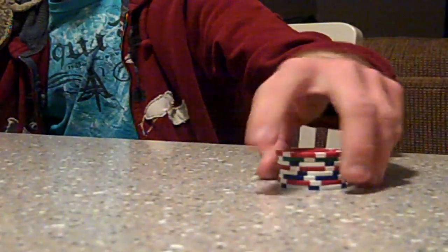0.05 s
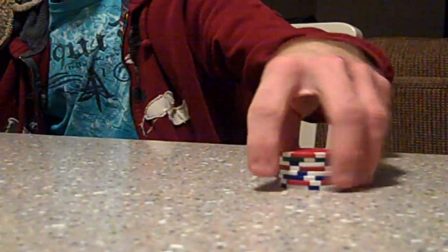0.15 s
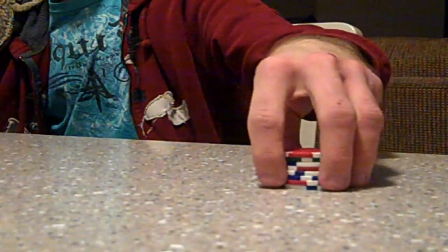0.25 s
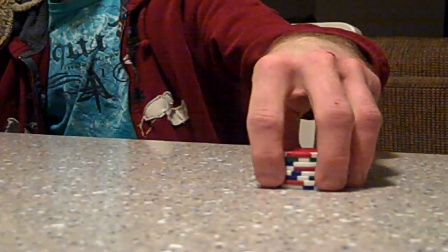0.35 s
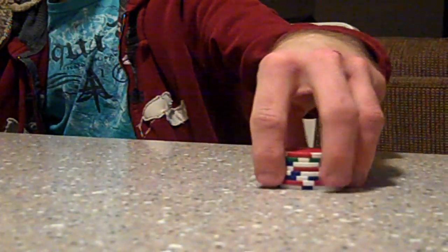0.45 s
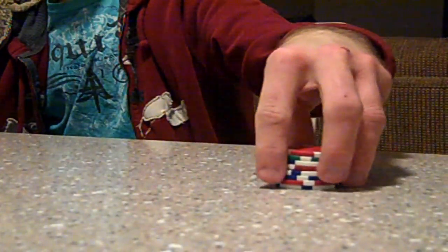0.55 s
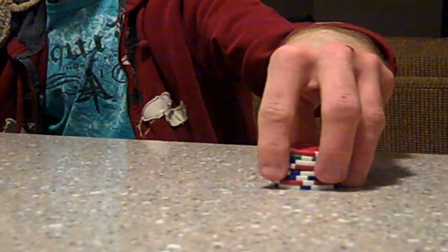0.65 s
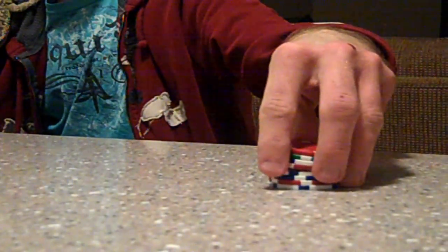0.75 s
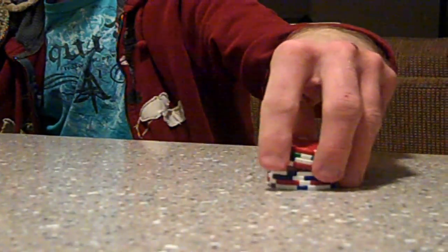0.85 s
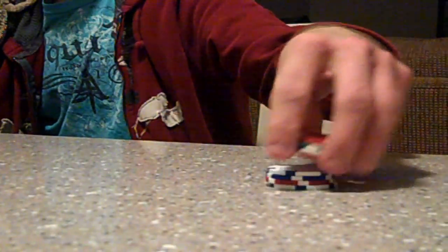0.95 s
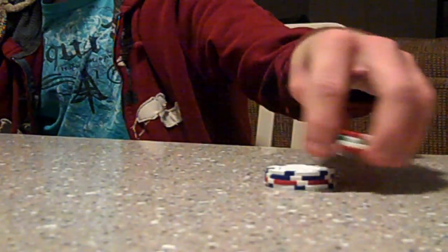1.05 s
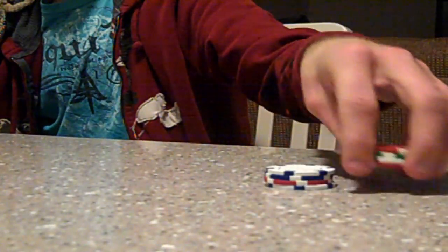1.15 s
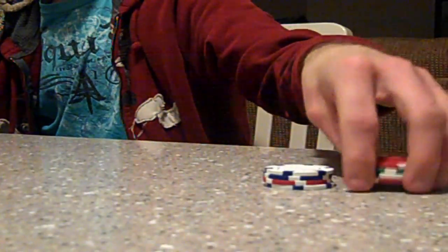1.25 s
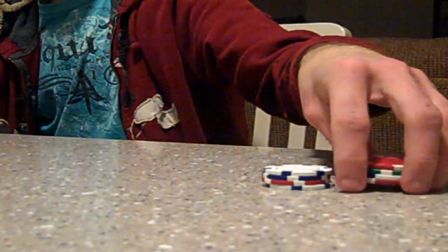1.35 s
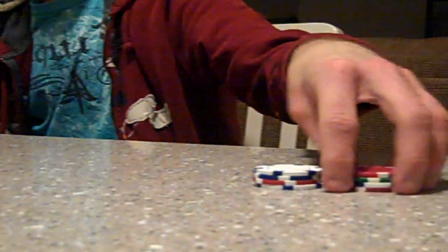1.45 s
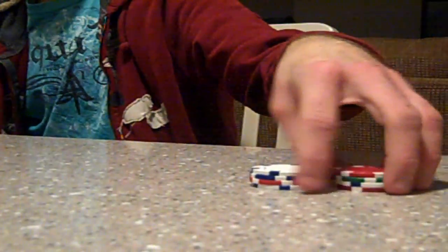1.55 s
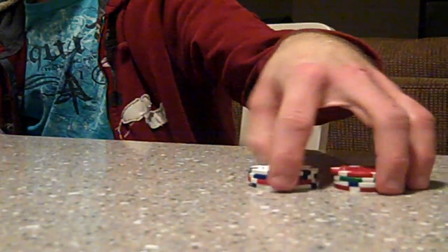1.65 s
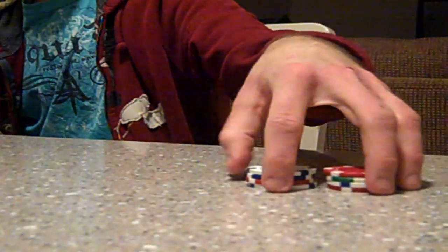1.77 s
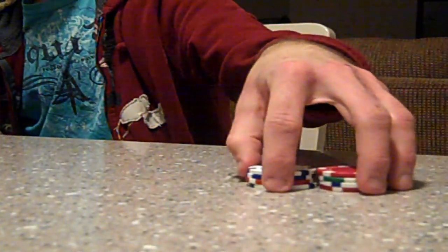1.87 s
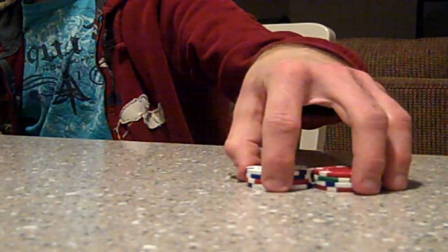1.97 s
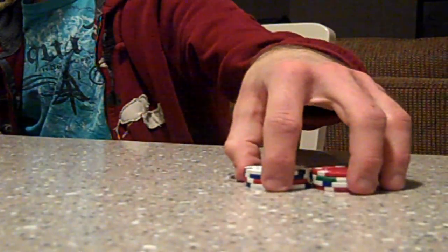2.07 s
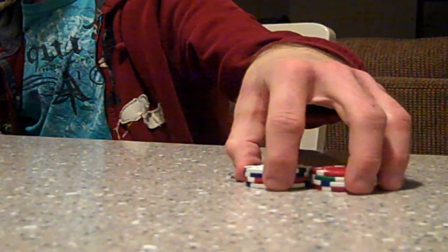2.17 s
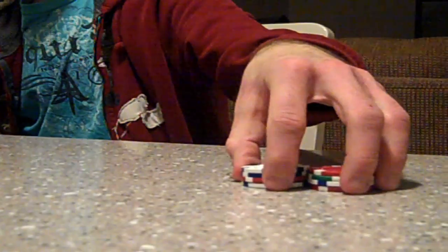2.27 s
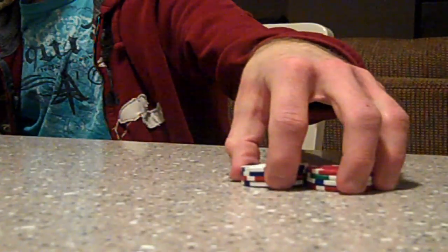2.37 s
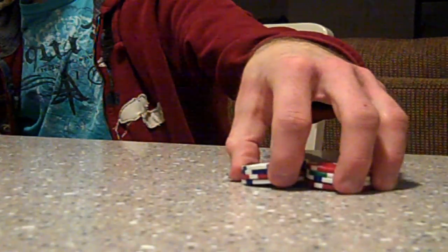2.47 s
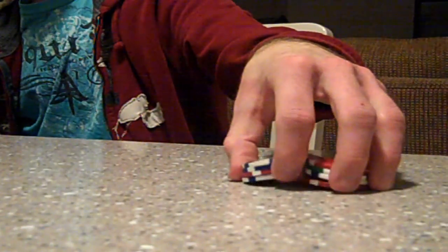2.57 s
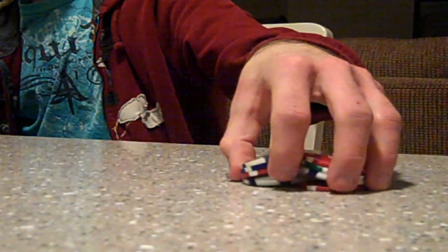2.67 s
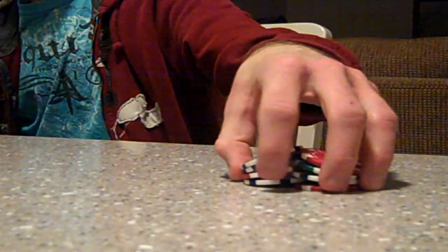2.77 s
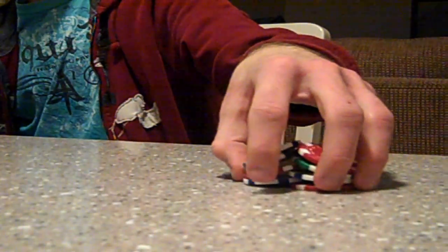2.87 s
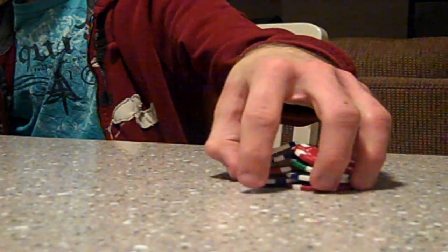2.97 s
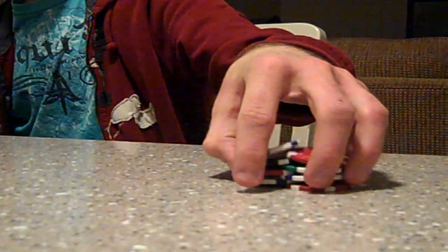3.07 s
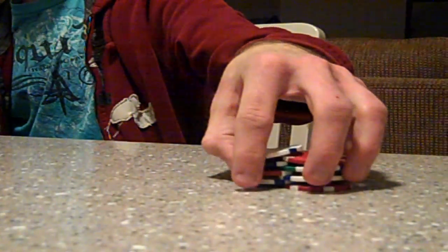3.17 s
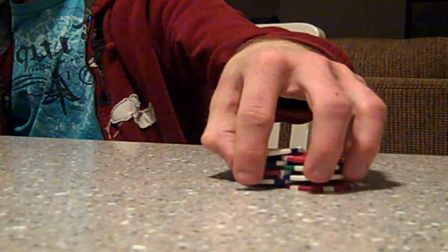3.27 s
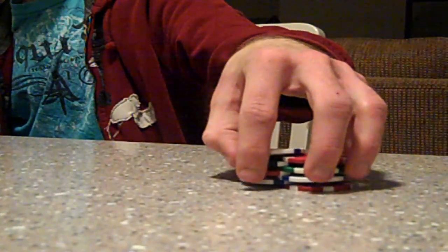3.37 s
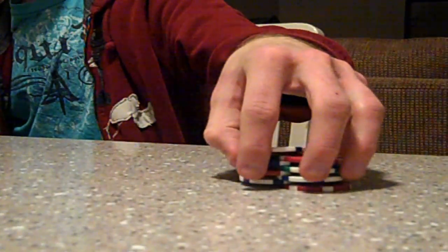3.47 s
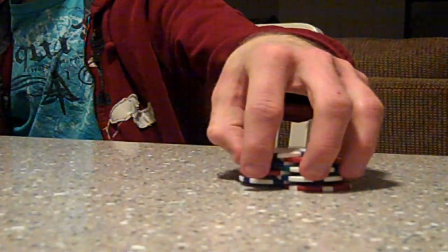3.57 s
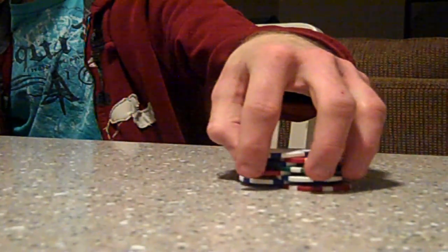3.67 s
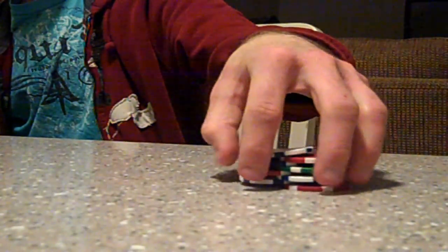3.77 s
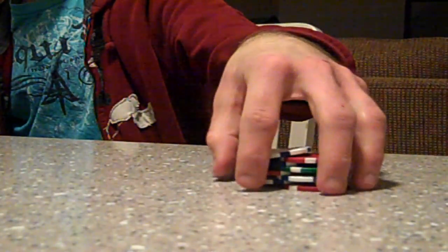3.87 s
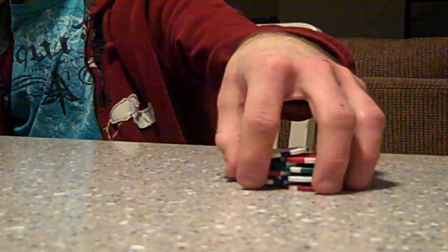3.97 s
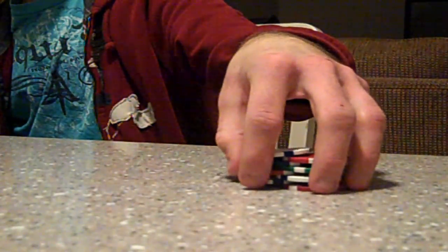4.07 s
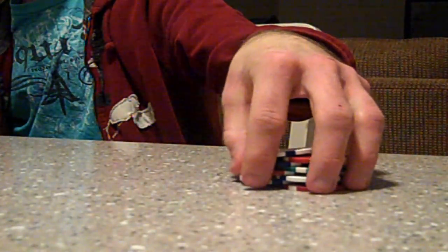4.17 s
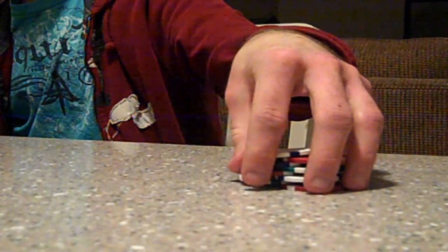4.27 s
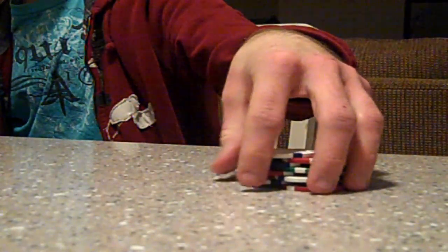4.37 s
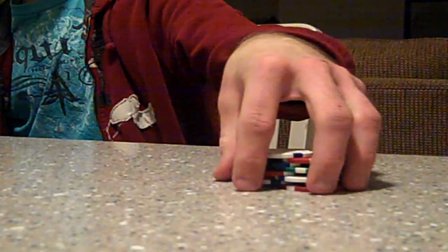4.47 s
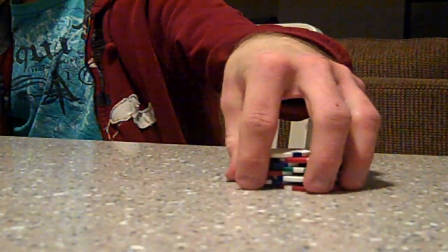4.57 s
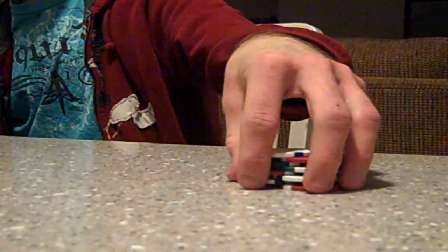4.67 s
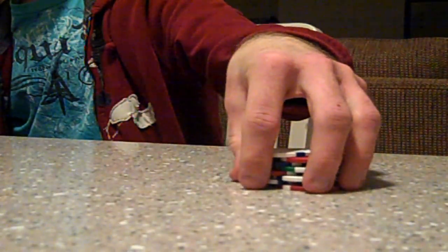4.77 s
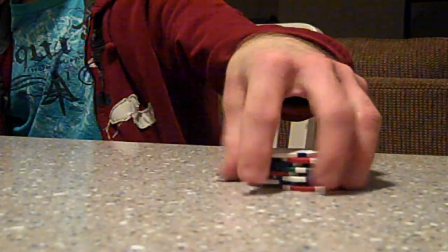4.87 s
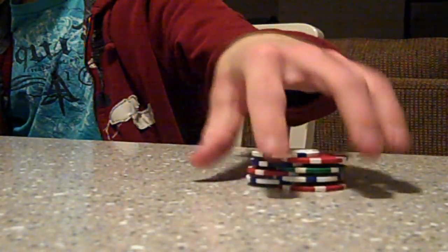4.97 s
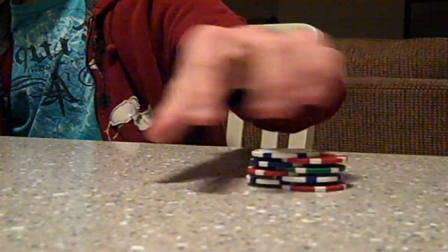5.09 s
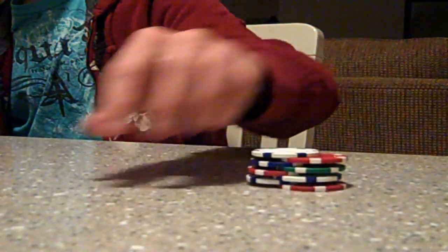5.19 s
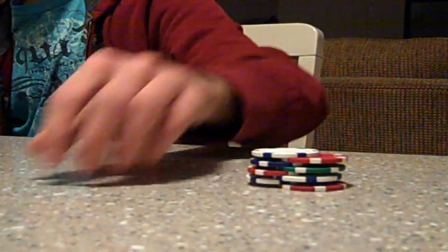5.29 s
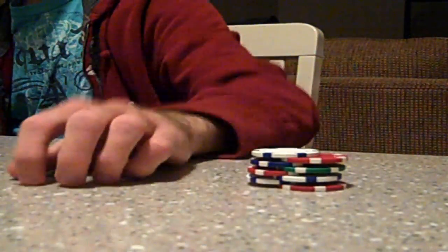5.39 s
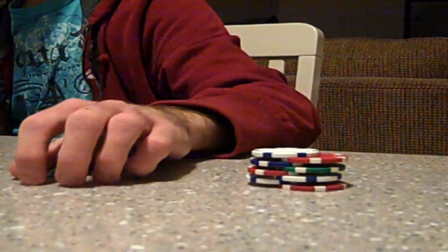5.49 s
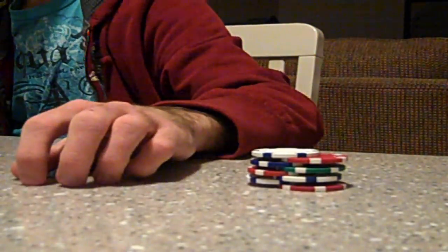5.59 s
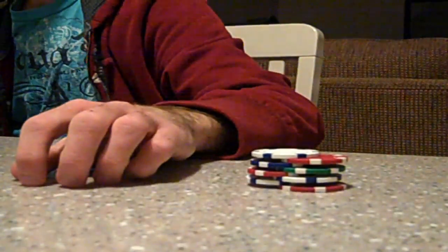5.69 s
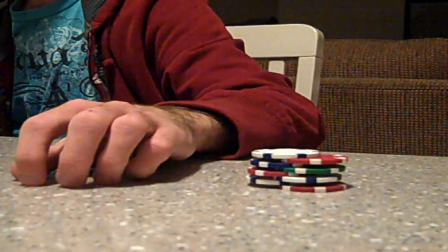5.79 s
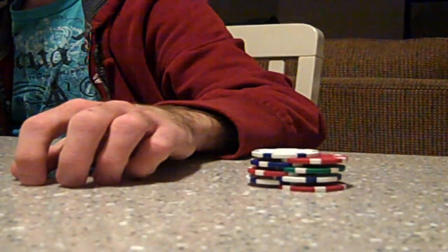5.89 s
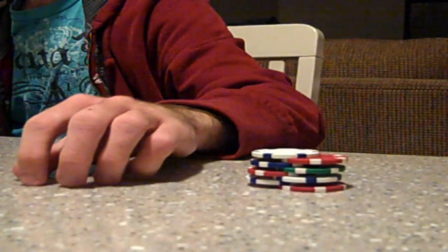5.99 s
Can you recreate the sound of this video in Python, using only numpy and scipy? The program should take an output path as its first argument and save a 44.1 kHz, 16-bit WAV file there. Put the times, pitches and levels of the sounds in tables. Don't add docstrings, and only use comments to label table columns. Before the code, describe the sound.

Poker chips clack loudly together, shuffle with bright rattling clicks and faint scrapes on a tabletop, then a hand comes to rest with a dull thud.

```python
import sys
import numpy as np
from scipy import signal
from scipy.io import wavfile

SR = 44100
rng = np.random.default_rng(int(sys.argv[2]) if len(sys.argv) > 2 else 0)


def output_pcm(signal):
    pcm = np.clip(np.atleast_2d(signal).T, -1, 1) * 32767
    wavfile.write(sys.argv[1], SR, np.round(pcm).astype(np.int16))


def decibels_to_gain(level_db):
    exponent = np.asarray(level_db, float) / 20
    return 10 ** exponent


N = 266231
LEAD = round(.06 * SR)
LENGTH = N + LEAD

# t/s, table top level/dB, chip face level/dB, chip edge level/dB
CHIP_STRIKES = [(1.4507, -84, -60, -34.5), (1.5036, -64, -28, -80), (1.5105, -22.5, -59, -33),
                (2.7333, -10.5, -2.5, -2.5), (2.7589, -21, -45, -26.5), (2.7687, -45, -51.5, -24.5),
                (2.8273, -13, -3, 1), (2.8328, -23.5, -22.5, -14.5), (2.8405, -28, -33, -25),
                (2.985, -43, -31, -56), (3.1093, -24, -27, -40), (3.1457, -19, -10, -21),
                (3.417, -29.5, -35, -64), (3.133, -23, -35, -30), (3.1646, -18, -21, -29),
                (3.1761, -21, -23, -31), (3.2162, -25.5, -14, -21), (3.2241, -22.5, -24, -29),
                (3.3828, -39.5, -41, -70), (3.4063, -41, -44, -64), (3.443, -34, -47, -48.5),
                (3.4873, -37, -32.5, -55.5), (3.566, -32.5, -44, -54), (3.6869, -21.5, -13, -28),
                (3.7008, -42, -24, -13.5), (3.704, -23, -24, -22.5), (3.7961, -43.5, -34, -52),
                (3.8859, -33.5, -24.5, -29.5), (3.9344, -36.5, -31, -42.5)]
# start t/s, gap t/s, table top level/dB, chip face level/dB, chip edge level/dB
CHIP_RUNS = [(-.04, .012, -15.5, -10, -7), (.002, .014, -27.5, -34, -29.5), (1.5132, .0017, -30.5, 5, 9),
             (1.5190, .0048, -14.5, 1.5, 5), (1.5323, 0.0047, -23.5, -11, 3), (2.7962, .0017, -23, -3, 2.5),
             (2.9378, .016, -24.5, -28.5, -41), (3.1159, 0.0061, -26, -16, -26),
             (3.1495, 0.0037, -25.5, -22, -32.5), (3.4218, .0054, -32, -20, -29),
             (3.6692, 0.0038, -31, -31.5, -38), (3.7566, 0.018, -37.5, -39, -45.5),
             (4.3212, 0.0079, -37, -32, -55)]
RUN_LOSS_DB = 2.5
# t/s, table top level/dB, chip face level/dB, chip edge level/dB
FINGER_TOUCHES = [(.29, -42, -47, -56), (.611, -45, -81, -74), (2.0099, -38.5, -46, -60),
                  (2.059, -38, -48, -69.5), (2.7057, -31, -37.5, -66.5), (3.2663, -41, -45, -59),
                  (3.792, -30.5, -35.5, -60.5), (3.326, -35, -58, -76.5), (3.5225, -42.5, -48, -71),
                  (3.983, -42.5, -71, -68), (4.184, -43, -62.5, -75), (4.224, -37.5, -71, -66),
                  (4.3605, -42, -38.5, -71), (4.487, -60, -50, -71), (4.572, -46.5, -53, -70.5),
                  (4.6436, -41.5, -39.5, -58.5), (4.934, -40, -66, -71), (4.9498, -49, -43, -49),
                  (5.005, -43.5, -51.5, -58), (5.4468, -26.5, -23.5, -29), (5.5096, -61, -38, -45.5),
                  (5.8185, -60.5, -40.5, -50.5), (5.8233, -60, -39, -45)]
# t/s, face f/Hz, edge f/Hz
GRIP_PITCHES = [(0, 2230, 8300), (1.45, 1800, 8100), (1.513, 1713, 6980), (1.545, 1899, 6920),
                (2.25, 1945, 5820), (2.734, 2430, 6020), (2.7975, 2500, 8000), (2.799, 2620, 5500),
                (2.846, 1860, 5300), (3.2, 1896, 5300), (3.42, 2530, 5340), (3.685, 1980, 5900),
                (3.7, 1960, 7120), (3.8, 1930, 7250), (3.886, 1900, 5800), (4.8, 2003, 5000),
                (5.5, 2390, 6850), (5.82, 1400, 7000)]
# f/Hz, level/dB, t60/s
TABLE_MODES = [(451, -12, 0.049), (510, -8, 0.061), (554, -6, 0.045), (625, -1.5, 0.076), (712, -2.5, .03),
               (774, -5, 0.029), (904, -8.5, 0.036), (1080, -10, 0.057)]
# f/Hz, level/dB, t60/s
FACE_MODES = [(1400, -11, 0.041), (1580, -9, 0.013), (1855, -2.5, 0.011), (2030, -3.5, 0.012),
              (2200, -9, 0.0054), (2504, -5, 0.0091), (2760, -5.5, 0.014), (3115, -7.5, 0.0092),
              (3650, -16.5, .005)]
# f/Hz, level/dB, t60/s
EDGE_MODES = [(4750, -17, .008), (4630, -8, 0.0076), (5300, -5.5, 0.0068), (5800, -0.5, 0.0051),
              (6140, -2.5, .006), (6750, -7, 0.0023), (7177, -7, 0.011), (7790, -3, 0.0088),
              (8290, -15.5, 0.0038), (10010, -13, .006), (11350, -21.5, .005), (12800, -23, 0.0031)]
SOFT_FROM_DB, SOFT_SLOPE = -14.5, 0.58
CRACK_DB, CRACK_T60_S = -7.5, .006

# f/Hz, t60/s
LOOSE_CHIP_PAIRS = [
    [(4420, .06), (4480, 0.091)],
    [(7265, 0.057), (7320, 0.18)],
    [(9820, 0.083), (9900, 0.043)],
]
# t/s, first pair level/dB, second pair level/dB, third pair level/dB
CHIP_SONGS = [(1.541, -20.5, -20, -22), (2.799, -47, -43, -45), (3.118, -41, -43, -45),
              (3.134, -59, -43, -56), (3.166, -37, -42, -45), (3.177, -34, -64, -63),
              (3.67, -48.5, -44, -48), (3.699, -52, -39.5, -47), (3.73, -51, -57, -69),
              (3.889, -55, -56, -55), (3.936, -65, -58, -63), (4.36, -61, -69.5, -74.5),
              (4.949, -53, -71.5, -65), (5.005, -64, -68, -67.5)]

# middle t/s, length t/s, level/dB
TABLE_RUBS = [(2.266, 0.045, -42), (2.415, 0.045, -56), (3.114, 0.022, -28), (3.902, .08, -51),
              (2.476, 0.058, -44.5), (2.526, 0.05, -43.5), (2.66, 0.056, -52), (2.692, 0.056, -37.5),
              (2.977, .06, -33.5), (3.13, 0.065, -28), (3.184, 0.03, -27), (3.26, .07, -47),
              (3.452, 0.13, -41.5), (3.582, 0.069, -39.5), (3.682, 0.039, -28), (3.744, 0.1, -40),
              (3.823, .045, -60), (4.245, 0.022, -52), (4.335, .06, -48.5), (4.49, 0.029, -51),
              (4.653, 0.058, -44.5), (4.8, 0.073, -43), (4.891, 0.035, -46.5), (5.017, .05, -50.5)]
RUB_EDGE_DB = -13.5
# middle t/s, length t/s, edge level/dB
EDGE_RATTLES = [
    (1.529, 0.043, -13.5),
    (2.263, .045, -49.5),
    (2.743, .02, -42),
    (2.862, 0.0367, -34),
    (5.81, .05, -58),
]
RATTLE_LOW_DB = -7.5

# f/Hz, level/dB, t60/s
THUMP_MODES = [(102, -9.5, 0.067), (144, -9.5, .15), (195, -3.5, 0.045), (227.6, -3, .12),
               (293.5, -2, 0.088), (366, -1.5, 0.084)]
# t/s, level/dB
STACK_PUSHES = [(.028, -50), (.303, -45.5), (2.15, -55), (2.807, -26), (2.876, -37.5), (3.215, -23.5),
                (3.262, -31), (3.424, -29), (3.471, -36.5), (3.499, -38), (3.583, -37), (3.698, -28),
                (3.767, -36), (3.839, -40), (3.893, -38), (3.943, -41), (4.002, -44), (4.338, -34.5),
                (4.486, -46.5), (4.658, -48), (5.02, -45), (5.221, -49.5), (5.35, -52)]
THROUGH_DB, THROUGH_S = -17, .005
# f/Hz, level/dB, t60/s
KNUCKLE_MODES = [(71.9, -23, .12), (97.6, 1, 0.21), (133, -1, 0.1), (182, -12.5, 0.386), (224, -10.5, 0.28),
                 (291.2, -2.5, 0.14), (363, 2, 0.051), (558, -13, 0.068), (621, -22.5, 0.067),
                 (770, -11, 0.046)]
# t/s, level/dB
HAND_KNOCKS = [
    (-.012, -41),
    (5.4467, -26.5),
    (5.512, -49.5),
]

# f/Hz, tail level/dB, t60/s
ROOM_TAIL = [(90, -10, 0.39), (248.8, -15, .4), (640, -5.5, 0.45), (1800, -16.5, 0.57), (4040, -15.5, .5),
             (7500, -21.5, 0.65), (10700, -13, .4), (15000, -22, .25)]
NEAR_DB, NEAR_T60_S = -13.5, 0.067
# f/Hz, level/dB (per Hz)
HISS_SPECTRUM = [(15, -40.5), (30, -15.5), (60, -10), (140, 2), (221, -2.5), (433, -7.5), (722, -9.5),
                 (1380, -15), (2120, -16.5), (3720, -20), (6050, -21.5), (11000, -26.5), (14200, -22),
                 (16000, -40.5)]
HISS_DB = -56.5


def clacks():
    s, top_db, face_db, edge_db = contacts()
    face_hz, edge_hz = free_modes(s)
    at = s * SR + LEAD
    softness_db = SOFT_SLOPE * np.maximum(SOFT_FROM_DB - face_db, 0)
    top = strike(TABLE_MODES, at, top_db - 3, .002, spread_db=0.5)
    face = strike(FACE_MODES, at, face_db - 4.5, .0014, spread_db=0.5, favour_hz=face_hz, favour_db=8.0,
                  dull_db=softness_db)
    edge = strike(EDGE_MODES, at, edge_db - 5, .0014, spread_db=2.0, favour_hz=edge_hz, favour_db=10.0)
    return top + face + edge


def contacts():
    runs = []
    for s, gap, *db in CHIP_RUNS:
        for k in range(3):
            runs.append((s + k * gap, *(np.array(db) - RUN_LOSS_DB * k)))
    return np.transpose(runs + list(CHIP_STRIKES) + list(FINGER_TOUCHES))


def free_modes(t):
    s, face_hz, edge_hz = np.transpose(GRIP_PITCHES)
    return np.interp(t, s, face_hz), np.interp(t, s, edge_hz)


def strike(modes, at, level_db, chatter_s, spread_db, favour_hz=1., favour_db=0., dull_db=0.):
    draw = rng.standard_normal((len(at), len(modes), 7))
    lag = rng.random((len(at), 6)) * [0, 1, 1, 1, 1, 1]
    late = (lag * chatter_s * SR).astype(int)
    when = (at.astype(int)[:, None] + late).ravel()
    out = np.zeros(LENGTH)
    for k, (hz, mode_db, t60) in enumerate(modes):
        grip_db = favour_db * np.exp(-(np.log(hz / favour_hz) / 0.089) ** 2)
        soft_db = dull_db * np.maximum(np.log2(hz / favour_hz), 0)
        db = level_db + mode_db + grip_db + spread_db * draw[:, k, 6] - soft_db
        size = draw[:, k, :6] * decibels_to_gain(-4.0 * lag)
        summed = np.abs(np.sum(size * np.exp(-2j * np.pi * hz * late / SR), axis=1))
        size = size * (decibels_to_gain(db) / (summed + 0.45))[:, None]
        clicks = np.bincount(when, size.ravel(), LENGTH)
        force = passband(clicks, hz / 1.72, min(hz * 1.64, 16000))
        out += ring(force, hz, t60)
    return out


def ring(clicks, hz, t60):
    r = decibels_to_gain(-60 / (max(t60, .002) * SR))
    w = 2 * np.pi * hz / SR
    return signal.lfilter([0, np.sin(w)], [1, -2 * r * np.cos(w), r * r], clicks + 1e-18)


def passband(x, low_hz, high_hz, order=1):
    return signal.sosfilt(signal.butter(order, [low_hz, high_hz], "band", fs=SR, output="sos"), x + 1e-18)


def crack():
    s, _, face_db, edge_db = contacts()
    at = (s * SR + LEAD).astype(int)
    clicks = np.bincount(at, decibels_to_gain((face_db + edge_db) / 2 + CRACK_DB), LENGTH)
    decay = signal.lfilter([1], [1, -decibels_to_gain(-60 / (CRACK_T60_S * SR))], clicks + 1e-18)
    return passband(decay * rng.standard_normal(LENGTH), 2800, 6800, order=2)


def singing():
    s, *pair_db = np.transpose(CHIP_SONGS)
    at = (s * SR + LEAD).astype(int)
    song = np.zeros(LENGTH)
    for pair, db in zip(LOOSE_CHIP_PAIRS, pair_db):
        clicks = np.bincount(at, decibels_to_gain(db), LENGTH)
        for hz, t60 in pair:
            song += ring(clicks, hz, t60)
    return passband(song, 4000, 8500, order=2)


def sliding():
    t = (np.arange(LENGTH) - LEAD) / SR
    low, high = np.zeros((2, LENGTH))
    slides = [(s, length, db, db + RUB_EDGE_DB) for s, length, db in TABLE_RUBS]
    slides += [(s, length, db + RATTLE_LOW_DB, db) for s, length, db in EDGE_RATTLES]
    for s, length, low_db, edge_db in slides:
        swell = np.cos(np.pi * np.clip((t - s) / length, -.5, .5)) ** 2
        low = low + decibels_to_gain(low_db) * swell
        high = high + decibels_to_gain(edge_db) * swell
    sizes = decibels_to_gain(4.5 * np.minimum(rng.exponential(1, LENGTH), 4)) * rng.choice([-1, 1], LENGTH)
    grit = (rng.random(LENGTH) < 3000 / SR) * sizes
    face_hz, edge_hz = free_modes(t)
    bodies = ((THUMP_MODES, low, -33), (TABLE_MODES, low, -22), (FACE_MODES, low, -22), (EDGE_MODES, high, -16))
    out = 0
    for modes, drive, trim_db in bodies:
        for hz, mode_db, t60 in modes:
            edge_grip_db = 8.8 * np.exp(-(np.log(hz / edge_hz) / 0.032) ** 2)
            face_grip_db = 6.0 * np.exp(-(np.log(hz / face_hz) / .1) ** 2)
            force = grit * drive * decibels_to_gain(trim_db + mode_db + edge_grip_db + face_grip_db)
            rub = passband(force, hz / 0.98, min(hz * 1.3, 16000))
            out = out + ring(rub, hz, t60)
    return out


def knock():
    touch_s, top_db = contacts()[:2]
    through = [touch_s + THROUGH_S, top_db + THROUGH_DB]
    s, thump_db = np.hstack([np.transpose(STACK_PUSHES), through])
    thump = strike(THUMP_MODES, s * SR + LEAD, thump_db - 2, 0.0049, spread_db=3.0)
    s, knock_db = np.transpose(HAND_KNOCKS)
    return thump + strike(KNUCKLE_MODES, s * SR + LEAD, knock_db + 8.5, 0.0016, spread_db=1.5)


def room(x):
    t = np.arange(round(.7 * SR)) / SR
    near = decibels_to_gain(NEAR_DB - 60 * t / NEAR_T60_S) / np.sqrt(NEAR_T60_S * SR / np.log(1e6))
    tail = 0
    for hz, band in bands(rng.standard_normal((2, len(t)))):
        t60 = at_hz(ROOM_TAIL, hz, column=2)
        late = decibels_to_gain(at_hz(ROOM_TAIL, hz) - 60 * t / t60) / np.sqrt(t60 * SR / np.log(1e6))
        tail = tail + band * (near + late)
    onset = np.clip((t - .001) / 0.002, 0, 1)
    return signal.fftconvolve(x, tail * onset)[:LENGTH]


def bands(white):
    edges = 22 * 2 ** np.arange(0, 9.7, .4)
    for k, (low, high) in enumerate(zip(edges, edges[1:])):
        band = signal.butter(2, [low, high], "band", fs=SR, output="sos")
        yield np.sqrt(low * high), signal.sosfilt(band, white[k % 2])


def at_hz(points, hz, column=1):
    points = np.array(points)
    return np.interp(np.log(hz), np.log(points[:, 0]), points[:, column])


def hiss():
    out = 0
    for hz, band in bands(rng.standard_normal((2, LENGTH))):
        knots = rng.standard_normal(LENGTH // 4000 + 2)
        wander = np.interp(np.arange(LENGTH) / 4000, np.arange(len(knots)), knots)
        wander_db = wander * 1.1 / (1 + hz / 500)
        out = out + band * decibels_to_gain(at_hz(HISS_SPECTRUM, hz) + wander_db)
    top = signal.cheby2(10, 50, 15400, fs=SR, output="sos")
    return decibels_to_gain(HISS_DB) * rms_one(signal.sosfilt(top, out))


def rms_one(x):
    return x / np.sqrt(np.mean(x ** 2) + 1e-20)


def scene():
    table = clacks() + singing() + sliding() + knock() + crack()
    table = table - .2 * passband(table, 3650, 4250)
    table = signal.sosfilt(signal.butter(2, 85, "high", fs=SR, output="sos"), table)
    return (table + room(table) + hiss())[None, LEAD:]


def band_limit(x):
    return signal.sosfilt(signal.butter(12, 20000, fs=SR, output="sos"), x)


def record(dry):
    steep = signal.cheby2(10, 60, 15800, fs=SR, output="sos")
    clipped = np.clip(signal.sosfilt(steep, dry), -1, 1)
    soft = signal.butter(4, 15500, fs=SR, output="sos")
    mix = signal.sosfilt(soft, clipped)
    return band_limit(mix)


dry = scene()
out = record(dry)
output_pcm(out)
```